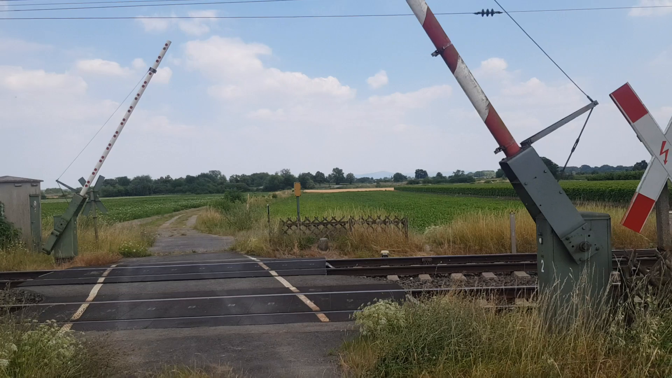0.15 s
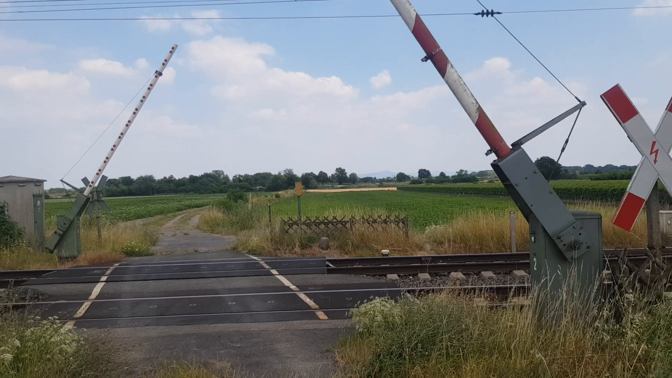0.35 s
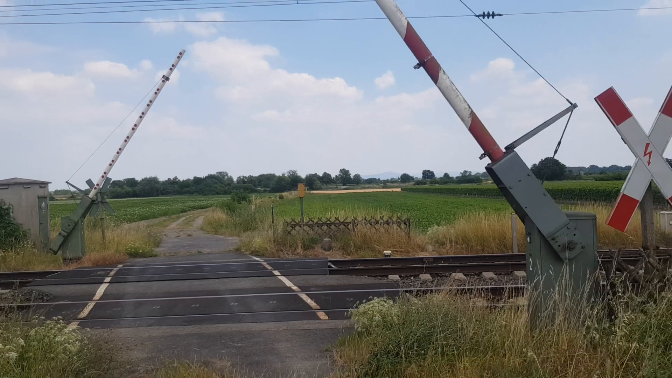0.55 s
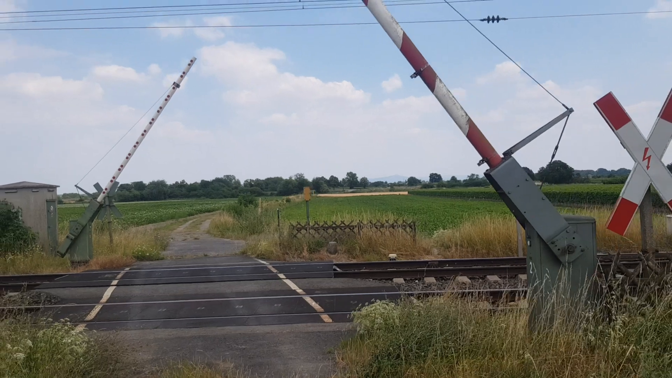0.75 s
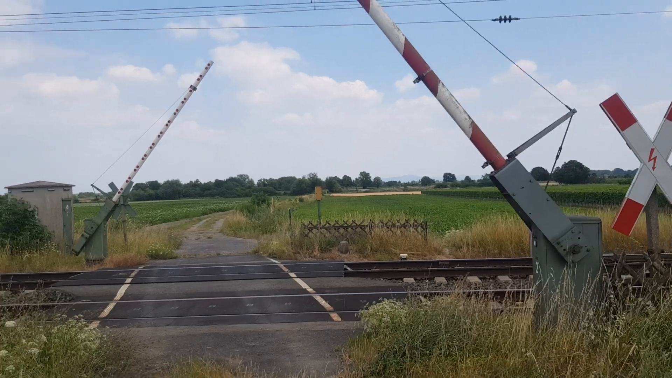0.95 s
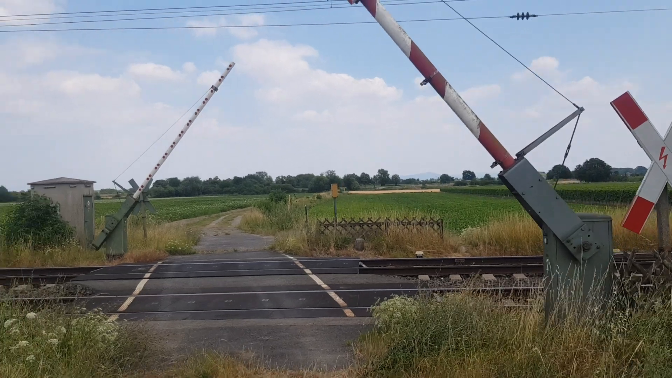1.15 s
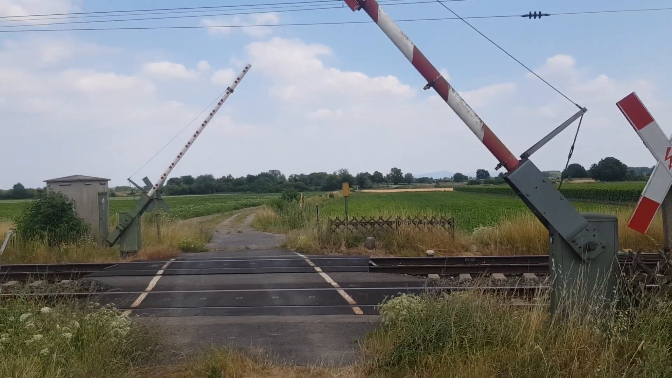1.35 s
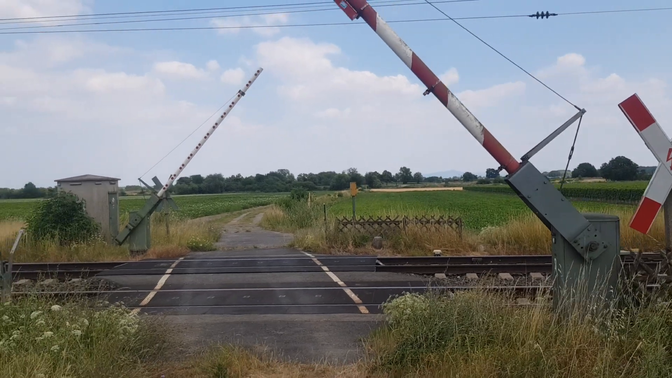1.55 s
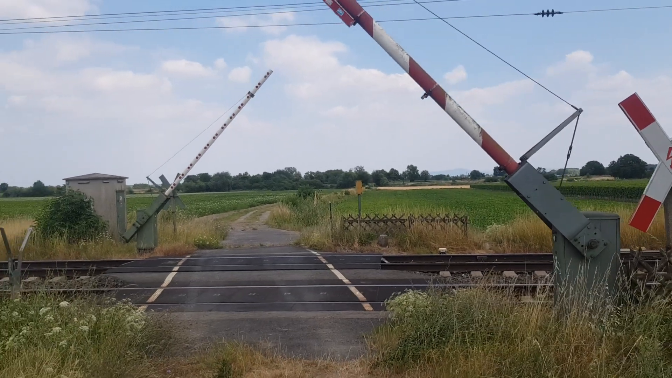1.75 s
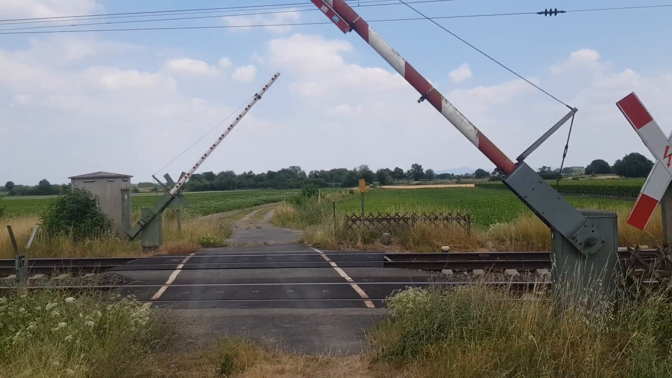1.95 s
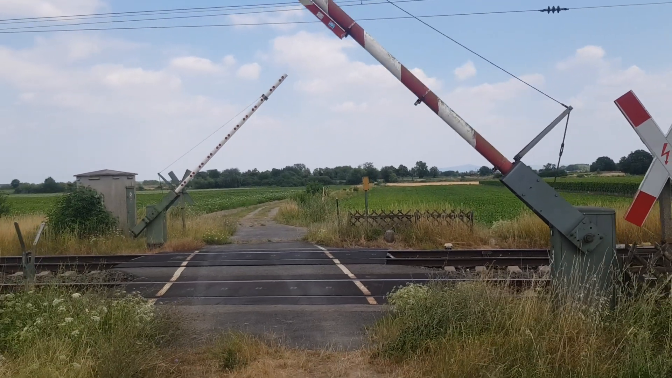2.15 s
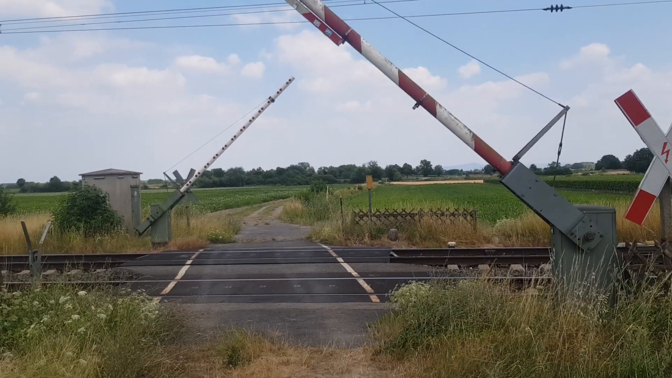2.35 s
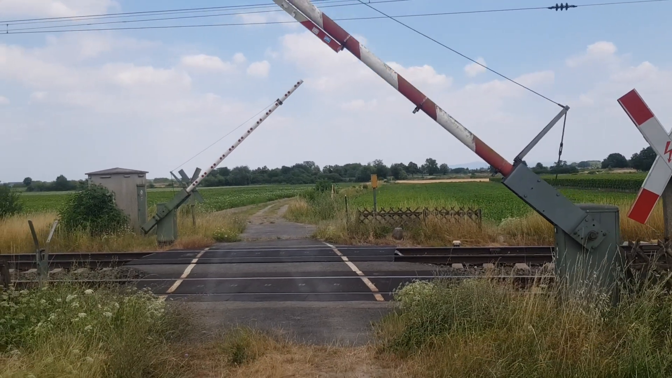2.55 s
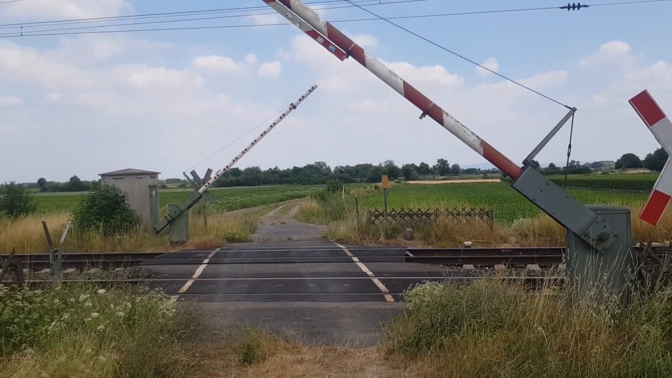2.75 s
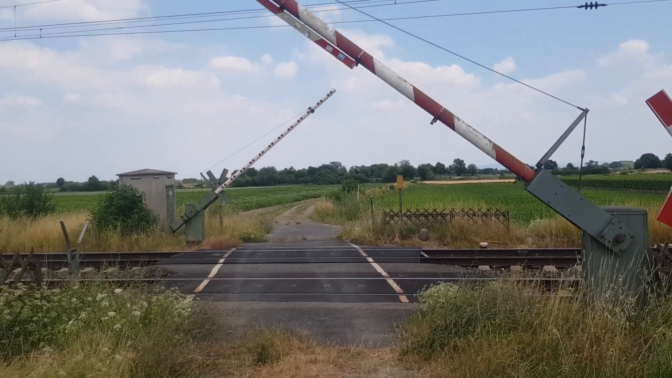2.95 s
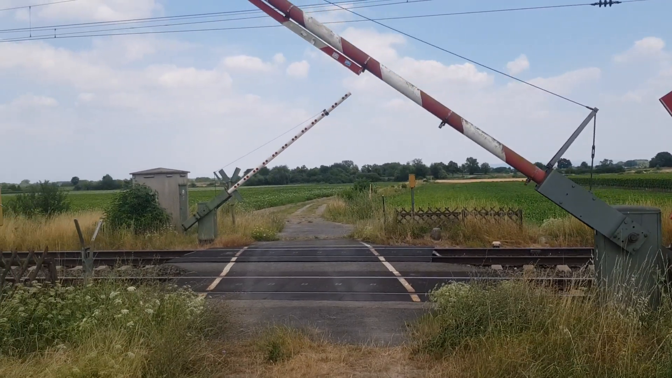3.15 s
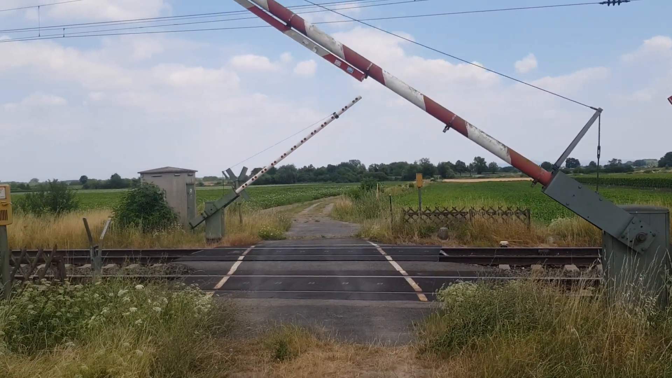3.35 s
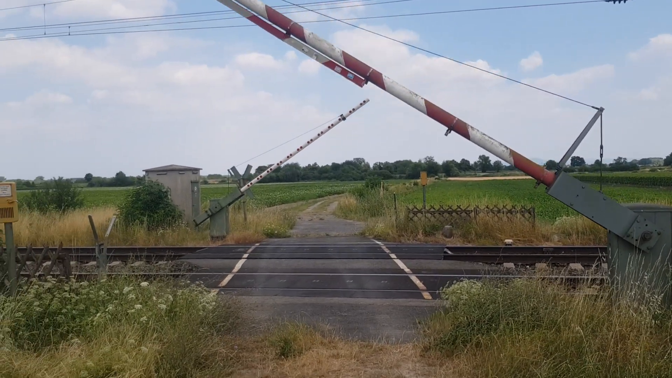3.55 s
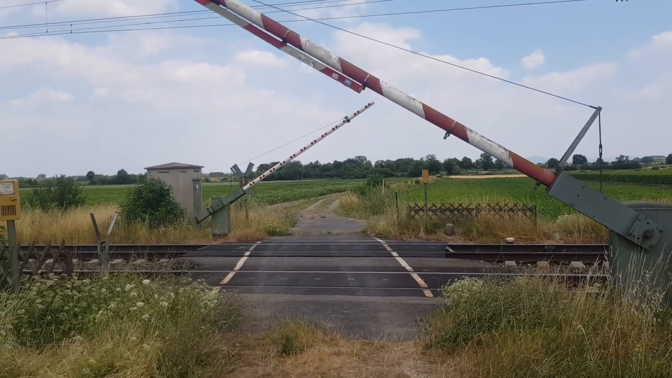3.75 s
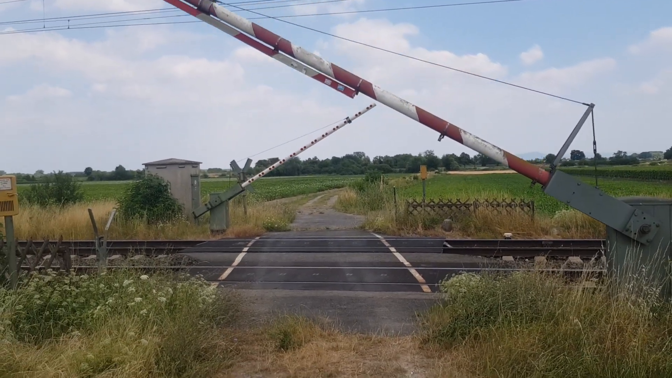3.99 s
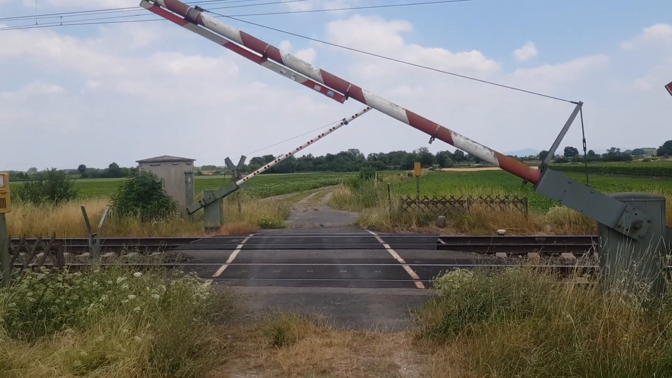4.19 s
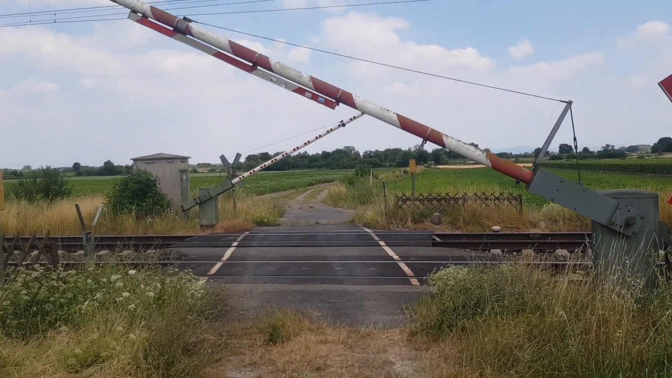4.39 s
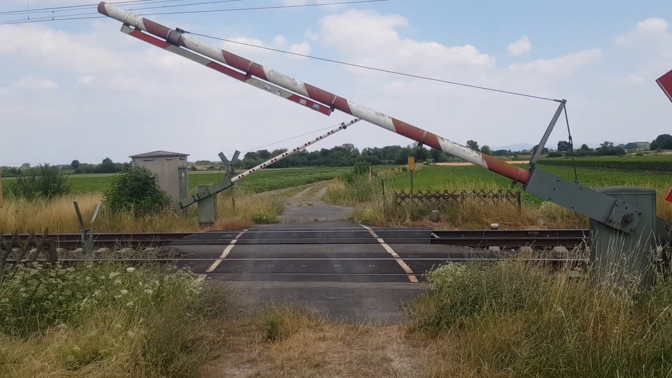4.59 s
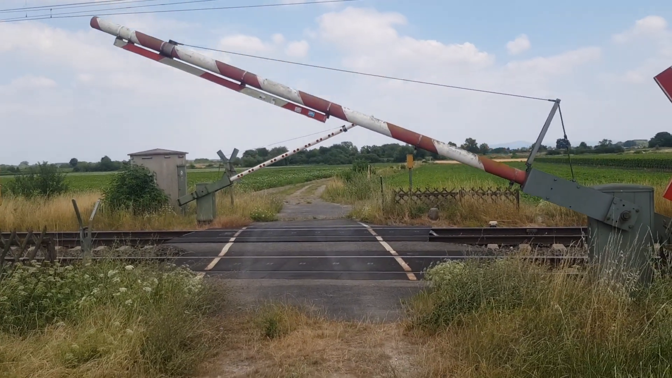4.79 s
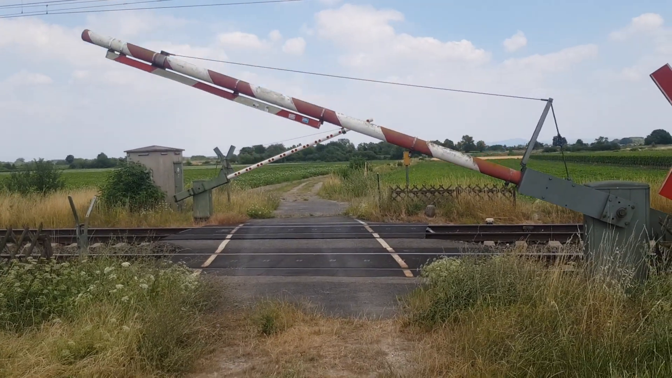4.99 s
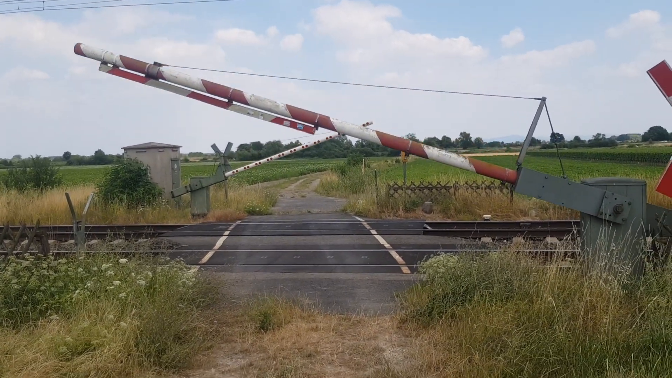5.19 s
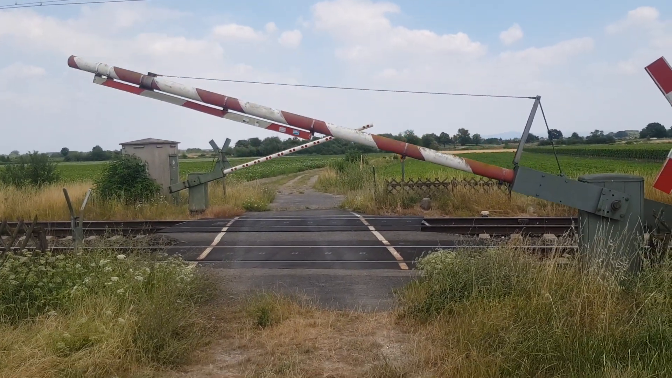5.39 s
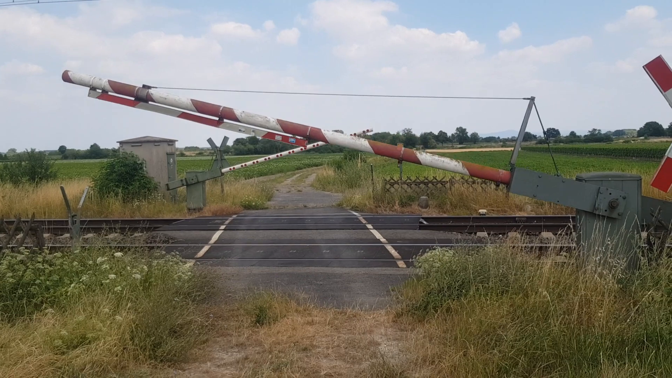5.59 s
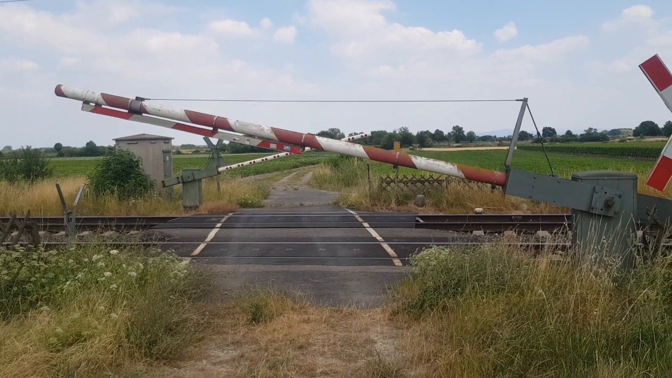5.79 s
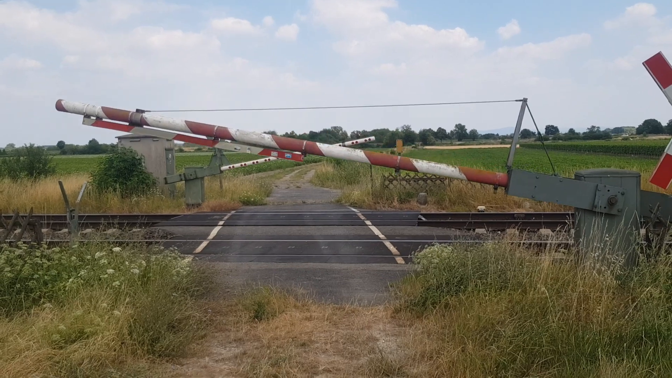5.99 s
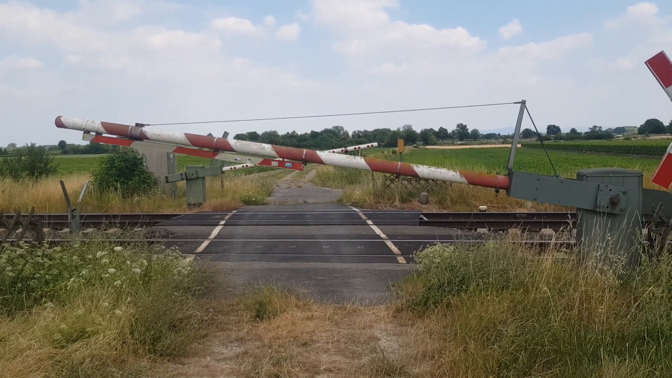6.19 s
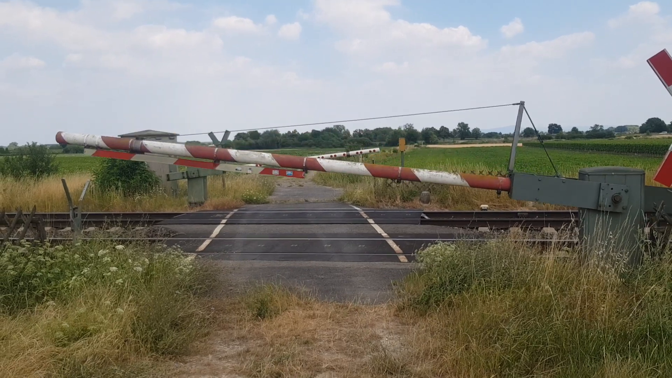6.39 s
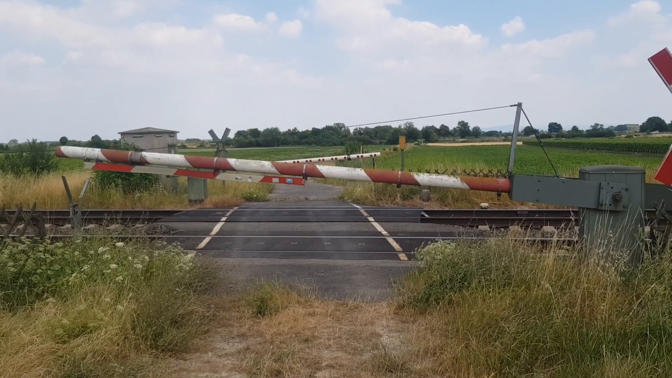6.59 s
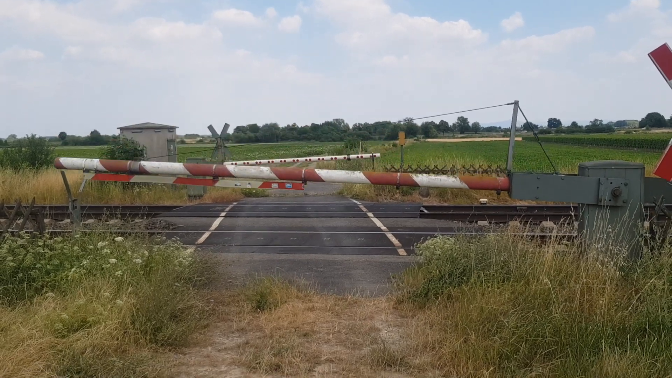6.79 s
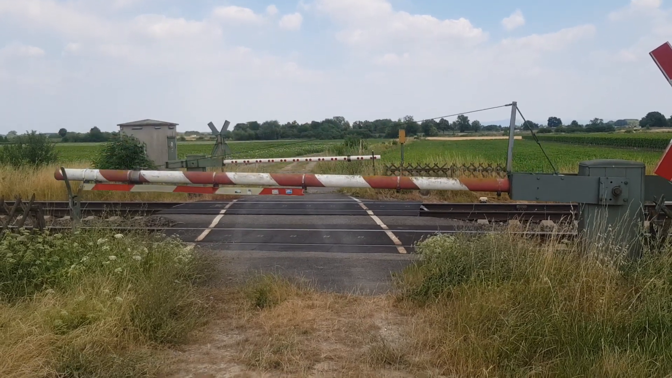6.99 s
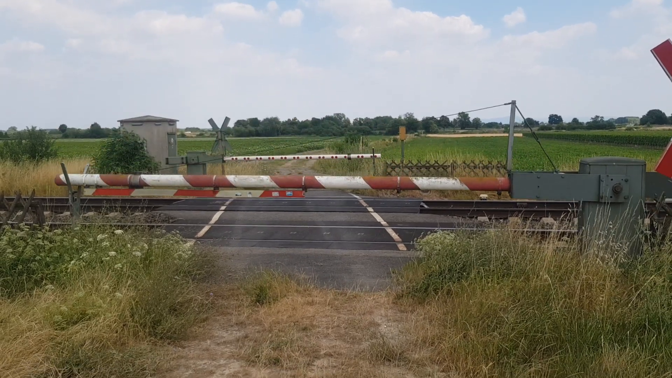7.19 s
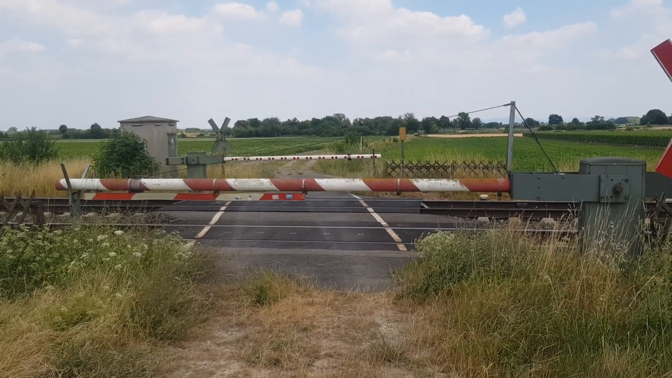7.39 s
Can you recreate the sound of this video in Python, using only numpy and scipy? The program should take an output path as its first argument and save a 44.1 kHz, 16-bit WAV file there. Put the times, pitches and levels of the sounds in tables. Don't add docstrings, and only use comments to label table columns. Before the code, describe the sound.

A hand-held stereo microphone outdoors picks up a barrier drive working under load: constant humming, rough bearing noise, faintly shifting gear whine. Tiny ticks come early, a dull thud later, then small rattles and a sharp housing knock on the left as the boom comes to rest. The pitch lifts a little, the motor switches off with a metallic click, and wind and a faint cricket remain.

```python
import sys
import numpy as np
from scipy import signal
from scipy.fft import rfft, irfft, next_fast_len
from scipy.io import wavfile
from scipy.ndimage import map_coordinates

SR = 44100
rng = np.random.default_rng(int(sys.argv[2]) if len(sys.argv) > 2 else 0)


def linear_from_db(decibels):
    return 10 ** (np.asarray(decibels, float) / 20)


def wav_record(signal):
    frames = np.transpose(np.atleast_2d(signal))
    bounded = np.clip(frames, -1, 1)
    quanta = np.round(bounded * 32767).astype(np.int16)
    wavfile.write(sys.argv[1], SR, quanta)


N = 328083


def unit(x):
    return x / np.sqrt(np.mean(x ** 2, axis=-1, keepdims=True) + 1e-20)


def along(points, hz):
    f, v = np.transpose(points)
    return np.interp(np.log(hz + 1), np.log(f + 1), v)


def curves(rows):
    s, *cols = np.transpose(rows)
    return [np.interp(np.arange(N) / SR, s, c) for c in cols]


def wobble(rate_hz):
    return np.interp(np.arange(N) * rate_hz / SR, np.arange(400), rng.standard_normal(400))


def since(s):
    return np.maximum(np.arange(N) / SR - s, 0)


def hump(s, half_s):
    return np.exp(-((np.arange(N) / SR - s) / half_s) ** 2)


def filtered(x, response):
    m = next_fast_len(x.shape[-1] + 8192)
    spectrum = rfft(x, m) * response(np.fft.rfftfreq(m, 1 / SR))
    return irfft(spectrum, m)[..., :x.shape[-1]]


def shaped(x, points):
    return filtered(x, lambda hz: linear_from_db(along(points, hz)))


def pair(alike, lag_s):
    def mid_side(hz):
        angle = np.arccos(np.clip(along(alike, hz), 0, 1)) / 2
        return np.array([np.cos(angle), np.sin(angle)])

    def late(hz):
        return np.exp(np.outer([-1, 1], 1j * np.pi * hz * lag_s))

    mid, side = filtered(rng.standard_normal((2, N)), mid_side)
    return filtered(np.array([mid + side, mid - side]), late)


# frequency in Hz, level in dB per Hz.
AIR_SPECTRUM = [(1500, -40), (3000, -4), (6000, -9), (7800, -14), (9600, -6), (15500, -4)]


def air():
    level_db = -73 + np.array([[5], [-5]])
    return linear_from_db(level_db) * unit(shaped(rng.standard_normal((2, N)), AIR_SPECTRUM))


# time in seconds, buffet level in dB.
BUFFET = [(0, -59), (.3, -62.5), (1.7, -64), (3.2, -60.5), (4.7, -60.5), (5.4, -63.5), (5.9, -63.5),
          (6.2, -57.5), (6.8, -58.5), (7.06, -55.5), (7.44, -56)]
# centre in seconds, rise in dB, half length in seconds, left over right in dB.
GUSTS = [(0.218, 1.5, 0.033, 20), (.46, 0, .05, 10), (0.856, 2, .08, 16), (2.468, 4.5, 0.091, 4),
         (3.102, 2, 0.093, -10), (4.263, 2, 0.16, 18), (5.578, 8.5, 0.038, 20), (5.95, 3.5, 0.023, 30),
         (6.153, 2, 0.11, 9), (6.45, 2, 0.13, 2), (6.68, 2.5, 0.032, 8), (6.883, 4, 0.044, 11),
         (7.15, -1.5, 0.12, 5), (7.376, 2.5, 0.13, 11)]
# frequency in Hz, level in dB per Hz.
RUMBLE_SPECTRUM = [(12, -42), (20, -13), (70, 2), (140, -12.5), (260, -46), (600, -65), (2000, -120)]
# frequency in Hz, level in dB per Hz.
FLAP_SPECTRUM = [(80, -42), (160, -1), (290, 0.5), (420, -9), (1200, -30), (4000, -120)]


def wind():
    buffet_db = curves(BUFFET)[0] + sum(db * hump(s, half_s) for s, db, half_s, _ in GUSTS)
    pan_db = sum(pan * hump(s, half_s) for s, _, half_s, pan in GUSTS) + 0.95 * wobble(3.8)
    rumble = unit(shaped(pair([(50, 0.45)], lag_s=0), RUMBLE_SPECTRUM))
    flap = unit(shaped(pair([(50, 0.62)], lag_s=0), FLAP_SPECTRUM))
    lumps = linear_from_db(0.45 * np.array([wobble(13), wobble(9.4)]))
    flap_db = 2.1 * (buffet_db + 53) - 2.5
    both = unit(lumps * rumble) + linear_from_db(flap_db) * lumps * flap
    return linear_from_db(buffet_db + 5.5 + 0.3 * np.outer([1, -1], pan_db)) * both


# centre in seconds, swell in dB, half length in seconds.
PHRASES = [(.5, 6, .3), (1.5, 4, .35), (1.97, 3, .25), (3.25, 10, .2), (3.8, 5, .15), (4.08, 5, .1),
           (4.58, 6, .25), (4.95, 4, .15), (5.35, 2, .06), (5.55, 8, .2), (6.0, 5, .1), (6.36, 6, .18),
           (7.22, 10, .25)]
# frequency in Hz, level in dB per Hz.
WING_SPECTRUM = [(12500, -36), (13600, -1), (14500, 17), (15600, 2), (17000, -34)]


def cricket():
    strokes_hz = 88.6 * (1 + 0.012 * wobble(2))
    strokes = np.cumsum(strokes_hz) / SR
    clicks = np.diff(np.floor(strokes), prepend=0) * linear_from_db(2.5 * wobble(60))
    click = shaped(clicks, WING_SPECTRUM)
    gate = np.exp(1.1 * (np.cos(2 * np.pi * strokes - 2.2) - 1))
    wing_back = gate * rng.standard_normal((2, N))
    rasp = filtered(wing_back, lambda hz: linear_from_db(along(WING_SPECTRUM, hz / 1.05)))
    wing = unit(np.array([click, np.roll(click, 5)])) + linear_from_db(-1) * unit(rasp)
    swell_db = sum(db * hump(s, half_s) for s, db, half_s in PHRASES)
    pan_db = np.array([[4], [-10]])
    return unit(wing) * linear_from_db(-73 + swell_db + 1.2 * wobble(25) + pan_db)


# start in seconds, left in dB, right in dB, frequency in Hz, swell in ms.
KNOCKS = [(5.5375, -21.5, -41, 342, 4.6), (5.5398, -26.5, -39, 694, 0.8), (5.5503, -18.5, -32, 134, 2.7),
          (5.565, -32, -46, 114, 5.5), (6.8625, -8, -37, 406, 2.14), (6.8629, -40, -20, 674, 1.5),
          (6.8664, -44, -29, 454, 3.3), (6.8621, -22.5, -40, 162, 5.4), (6.8625, -26.5, -43, 1110, 1.8),
          (6.863, -35.5, -50, 1990, 1.2), (6.8738, -21.5, -38, 455, 2), (6.886, -36, -43, 427, 3.1),
          (6.8625, -20.5, -39, 780, 2.2)]
# start in seconds, left in dB, frequency in Hz, swell in ms.
RATTLES = [(6.419, -35.5, 250, 5.1), (6.428, -39, 109, 6.5), (6.463, -25.5, 448, 1.04),
           (6.462, -35, 960, 0.57), (6.502, -40, 475, 2.2), (6.647, -43, 132, 4), (6.685, -42, 915, 2.1),
           (6.975, -39, 160, 2.3), (7.131, -34, 110, 7.4), (7.135, -36, 250, 4.4), (7.226, -39, 129, 3.4)]
# start in seconds, left in dB, right in dB, frequency in Hz.
BUMPS = [(0.421, -36, -51, 61.3), (0.931, -51, -51, 134), (1.73, -50, -51, 111), (2.465, -35, -58, 60),
         (3.368, -41, -49, 120), (4.161, -34, -47, 74), (4.204, -39, -59, 90), (4.224, -30.5, -54, 90.5),
         (4.28, -34, -50, 69), (4.341, -34.5, -54, 75), (4.514, -59, -39, 62), (5.933, -50, -62, 59)]


def blows():
    out = np.zeros((2, N + SR))
    t = np.arange(SR // 8) / SR
    rattles = [(s, db, db - 16, hz, ms) for s, db, hz, ms in RATTLES]
    bumps = [(*row, 1000 * 0.49 / row[-1]) for row in BUMPS]
    for s, left_db, right_db, hz, swell_ms in KNOCKS + rattles + bumps:
        u = 1000 * t / swell_ms
        ring = u * np.exp(1 - u) * np.sin(2 * np.pi * hz * t)
        out[:, round(s * SR):][:, :len(t)] += np.outer(linear_from_db([left_db, right_db]), ring)
    return out[:, :N]


# start in seconds, left in dB, right in dB, part.
TICKS = [(1.5, -38, -38, 'contact'), (1.565, -38, -37, 'contact'), (1.565, -38, -34, 'link'),
         (1.574, -41, -37, 'link'), (6.862, -39, -46, 'lever'), (7.02, -42, -44, 'shoe'),
         (7.301, -39, -29, 'pawl'), (7.301, -36, -44, 'spring'), (7.297, -50, -58, 'cap'),
         (7.298, -34, -36, 'frame'), (7.025, -54, -62, 'wire')]
PARTS = {'contact': (4200, 3400, .006), 'link': (1780, 900, .018), 'lever': (2700, 1200, .006),
         'pawl': (4100, 1300, .018), 'spring': (6100, 1800, .016), 'cap': (9600, 2000, .02),
         'frame': (1000, 1400, .08), 'wire': (6900, 900, .09), 'shoe': (2000, 900, .15)}


def ticks():
    out = np.zeros((2, N + SR))
    t = np.arange(SR // 8) / SR
    for s, left_db, right_db, part in TICKS:
        hz, width_hz, t60_s = PARTS[part]

        def resonance(f):
            return (1j * f * width_hz / (hz * hz - f * f + 1j * f * width_hz)) ** 3

        noise = [[1, 0.98], [1, -0.54]] @ rng.standard_normal((2, len(t)))
        crack = filtered(linear_from_db(-60 * t / t60_s) * noise, resonance)
        crack = crack / np.abs(crack).max(axis=1, keepdims=True)
        out[:, round(s * SR):][:, :len(t)] += linear_from_db([[left_db], [right_db]]) * crack
    return out[:, :N]


LANDS_S, RACE_S, CUT_S = 6.885, 0.06, 7.2
LINES_DIE_DB_PER_S = -35


def shaft():
    loaded_hz = 35.345 + 0.022 * since(0) + 0.05 * wobble(7)
    race_hz = 1.15 * (1 - np.exp(-since(LANDS_S) / RACE_S))
    sag_hz = 5.2 * since(CUT_S)
    return 2 * np.pi * np.cumsum(loaded_hz + race_hz - sag_hz) / SR


BOOM_S = (0.3, 3.07, 6.9)


def boom(*height_db):
    return np.interp(np.arange(N) / SR, BOOM_S, height_db)


def worn(turn):
    marks = rng.standard_normal((2, 24, 1300))
    slow = np.arange(N) * 22 / N
    round_shaft = turn / (2 * np.pi) % 1 * 1246
    near, own = (map_coordinates(m, [slow, round_shaft], order=1) for m in marks)
    return unit(np.array([np.roll(near, 7) + 0.7 * own, near]))


# time in seconds, noise power in dB, gear hum in dB.
DRIVE = [(0.0, 2.5, -56.5), (0.29, 1, -54.5), (0.599, 0.5, -53.5), (1.4, 0.5, -51), (1.86, -0.5, -50.5),
         (2.3, 0, -49.5), (3.6, -0.5, -50.5), (4.6, -.5, -52.5), (5.3, -1.5, -52.5), (6.0, 0, -49),
         (6.65, 1, -49.5), (6.82, 1, -51), (6.93, 1.5, -59), (7.08, 2.5, -51.5), (7.17, 2.5, -45.5),
         (7.22, 1, -61), (7.31, 2.5, -53), (7.44, -7.5, -74)]
# boom high in dB, half in dB, low in dB, change after the cut in dB per s.
GROWL = (-55, -54.5, -52.5, 13)
WHIRR = (-52.5, -51, -52.5, -8)
HISS = (-66.5, -67, -69, -5)
# frequency in Hz, width in Hz, gain in dB.
CASING = [(662, 57, 3), (1544, 120, 6), (2250, 110, 1.5), (3200, 380, 0), (4490, 88, 3), (6100, 130, 5.5),
          (9430, 210, 2), (10700, 130, 6)]
# frequency in Hz, level in dB per Hz.
LEFT_PORT = [(150, -0.5), (280, -7.5), (400, 13.5), (600, 8.5), (1000, 3), (1500, 5.5), (2200, 8.5),
             (3000, 9.5), (3800, 1), (5500, -1), (7800, -14), (9600, -1), (13000, -7.5), (15300, -9.5)]
RIGHT_PORT = [(150, -4), (280, -2), (400, 3), (600, 7), (1000, 2), (1500, 2), (2200, 4), (2500, -4),
              (4500, 6), (5700, -5.5), (7000, -34), (8800, -13.5), (10300, -34.5), (15300, -27.5)]
# frequency in Hz, likeness 0 to 1.
ALIKE = [(200, 1), (500, 0.63), (1000, 0.39), (2000, 0.23), (3300, 0.23), (6000, 0.13), (8000, 0.056)]


def whirr(turn):
    def band_db(high_db, half_db, low_db, fade_db_per_s):
        return curves(DRIVE)[0] + boom(high_db, half_db, low_db) + fade_db_per_s * since(CUT_S)

    def casing_and_ports(hz):
        casing_db = sum(db / (1 + (2 * (hz - c) / w) ** 2) for c, w, db in CASING)
        ports_db = [along(LEFT_PORT, hz), along(RIGHT_PORT, hz)]
        return linear_from_db(ports_db) * linear_from_db(casing_db) * (hz > 90)

    marks = linear_from_db(LINES_DIE_DB_PER_S * since(CUT_S) - 8) * worn(turn)
    noise = filtered(pair(ALIKE, lag_s=0.00013) + marks, casing_and_ports)
    low = filtered(noise, lambda hz: 1 / (1 + (hz / 1400) ** 4))
    hiss = filtered(noise, lambda hz: 1 / (1 + (7600 / (hz + 1)) ** 8))
    mid = noise - low - hiss
    growl_db = band_db(*GROWL) - 0.5 + 2.0 * wobble(10)
    whirr_db = band_db(*WHIRR) - 1.0
    brush_drop_db = -7 * (1 - np.exp(-since(CUT_S) / 0.033))
    hiss_db = band_db(*HISS) + 3.0 + brush_drop_db
    high = mid / np.std(mid) * linear_from_db(whirr_db) + hiss / np.std(hiss) * linear_from_db(hiss_db)
    throb = 1 + 0.037 * np.cos(turn) + 0.038 * np.cos(5 * turn)
    return high * throb * linear_from_db(0.24 * wobble(8)) + low / np.std(low) * linear_from_db(growl_db)


def line(k, db, pan_db, lead, turn, offset):
    k = round(k)
    left = 1 / np.sqrt(1 + linear_from_db(-2 * pan_db))
    right = np.sqrt(1 - left ** 2)
    beat = np.roll(offset, rng.integers(1246))
    size = 2 * linear_from_db(db) * (1 + np.clip((k - 50) / 60, 0, 1) * beat)
    phase = k * turn + rng.uniform(0, 2 * np.pi) + 0.0094 * k * wobble(30)
    return size * [left * np.sin(phase), right * np.sin(phase + lead)]


# multiple of shaft speed, left over right in dB, right lead in rad.
MAIN_ORDERS = [(12, 0.5, 0.35), (40, -1, 1.84), (45, -3, 1.0), (128, -13.5, -1.95)]
# rest in dB, swell in dB, centre in seconds, half length in seconds, second centre in seconds.
WHINE_SWELLS = [(-66, 14, .7, 1.3, -9), (-61.5, 8, 6.5, .75, -.5), (-65.5, 8, .2, .35, 3.3)]
# multiple of shaft speed, left over right in dB, right lead in rad.
WEAK_ORDERS = [(18, -8, 0), (21, 16, -.4), (24, 16, -.1), (25, 5, -2.5), (33, 0, -2.5), (35, -2, .1),
               (50, -13, 3), (52, 13, 1.3), (54, 19, -1), (58, 3, 1), (61, -1, -1.5), (62, 2, -2),
               (64, 7, 2), (69, 8, 3.5), (76, 19, 1), (78, 12, -1.5), (83, 15, .3), (85, 11, -2.5),
               (88, 10, -.3), (91, 10, -1.8), (100, 8.5, -.5), (113, 8, 1), (117, -7, -1.6), (120, 1, 0),
               (124, -8, -1.3), (164, 8, 0), (263, 13, 0), (277, 13, 0), (282, 13, 0), (322, 13, 0)]
# boom high in dB, boom half in dB, boom low in dB.
WEAK_LEVELS = [(-69, -69.5, -63.5), (-77, -69, -61), (-63.5, -67, -68.5), (-71, -65, -66),
               (-62, -66, -59.5), (-61.5, -72, -96), (-67, -70, -66), (-65, -75.5, -57), (-98, -74, -68),
               (-66, -91, -67), (-69.5, -62, -93), (-74, -67, -90), (-58.5, -61, -60), (-82, -80, -70),
               (-84, -81.5, -72), (-71, -74, -63.5), (-59.5, -60.5, -62), (-64, -66, -65),
               (-61, -66.5, -65), (-68, -69, -62), (-64.5, -64.5, -69.5), (-72, -94, -83), (-82, -74, -64),
               (-82, -75, -79), (-66, -72, -96), (-75, -76, -85), (-75, -81, -87), (-69, -87, -76),
               (-98, -89, -86), (-90, -77, -80)]


def gears(turn):
    unload_db = -4 * (1 - np.exp(-since(LANDS_S) / RACE_S))
    dying_db = LINES_DIE_DB_PER_S * since(CUT_S) + unload_db
    offset = np.clip(0.39 + 0.4 * wobble(14), 0, 1) * np.cos(turn + 0.5 * wobble(4.2))
    main_db = [curves(DRIVE)[1]]
    for rest_db, swell_db, s, half_s, again_s in WHINE_SWELLS:
        swell = hump(s, half_s) + hump(again_s, half_s)
        main_db.append(rest_db + swell_db * swell + 0.66 * wobble(4) + dying_db)
    out = np.zeros((2, N))
    for (k, pan_db, lead), db in zip(MAIN_ORDERS, main_db):
        out += line(k, db + 0.8 * wobble(18), pan_db, lead, turn, offset)
    for (k, pan_db, lead), height_db in zip(WEAK_ORDERS, WEAK_LEVELS):
        flutter_db = 2.2 * wobble(14) + 1.0 * wobble(2.52)
        out += line(k, boom(*height_db) + dying_db + flutter_db, pan_db, lead, turn, offset)
    return out


def scene():
    turn = shaft()
    return air() + wind() + cricket() + blows() + ticks() + whirr(turn) + gears(turn)


def band_limit(x):
    return signal.sosfilt(signal.butter(12, 16470, fs=SR, output="sos"), x)


def record(dry):
    mix = filtered(dry, lambda hz: hz < 15815)
    return band_limit(mix)


dry = scene()
out = record(dry)
wav_record(out)
```